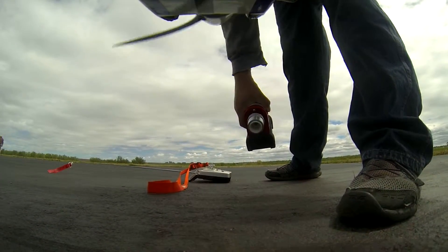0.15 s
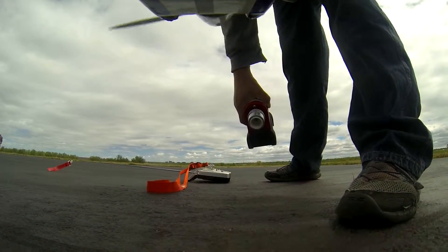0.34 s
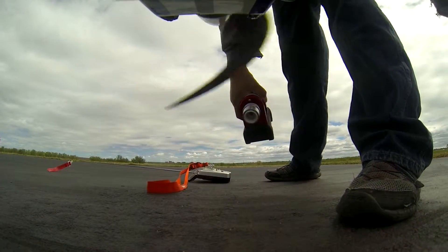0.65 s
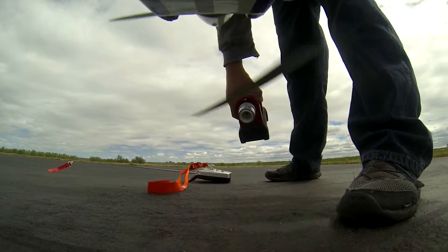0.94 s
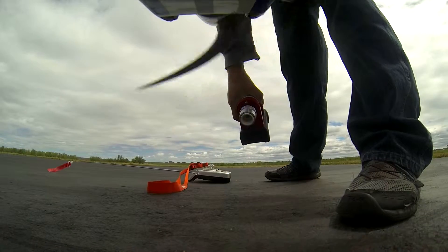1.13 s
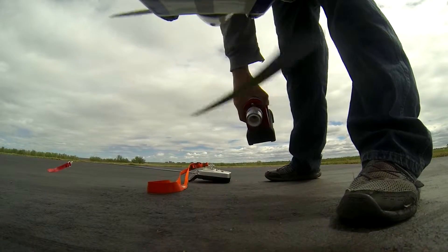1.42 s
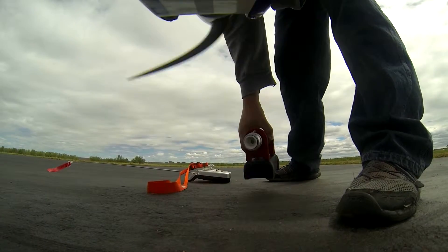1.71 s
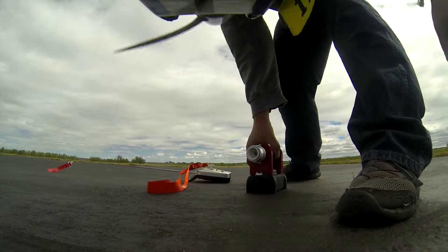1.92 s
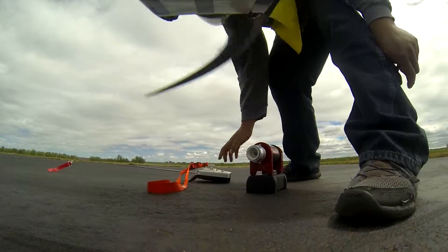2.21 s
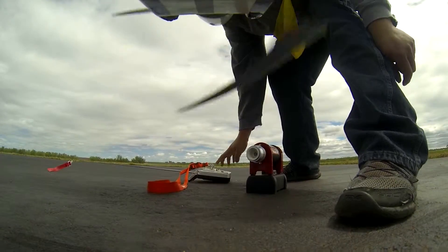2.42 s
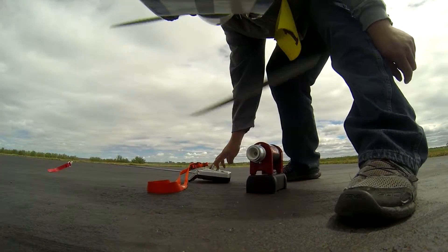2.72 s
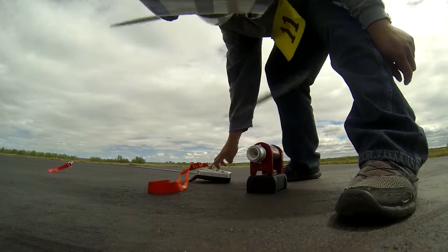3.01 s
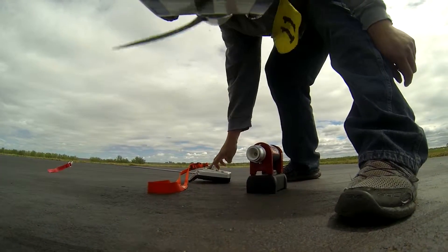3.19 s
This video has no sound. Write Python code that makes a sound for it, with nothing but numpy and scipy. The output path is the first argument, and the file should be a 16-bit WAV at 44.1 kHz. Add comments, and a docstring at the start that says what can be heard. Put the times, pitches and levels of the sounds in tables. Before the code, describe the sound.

A model aircraft's two-stroke engine idles close by in the open air from start to finish, with rapid, slightly uneven low exhaust thumps. Fine metallic ticking runs along with it, the shaken airframe rattles, and loose fittings clack now and then over a soft rush of propeller air. From about 3 seconds the engine fires faster and picks up slightly, until the end at around 3.4 seconds.

```python
"""A model aircraft's two-stroke engine idles on a runway, close by, at about 19 turns a second.
It fires mostly on every second turn, and on every turn as it picks up at the end. Each firing thumps in
the exhaust; piston and ports tick three times a turn, and the shaken airframe rattles in step with the
crank. Propeller wash rushes underneath."""
import sys
import numpy as np
from scipy import signal
from scipy.fft import rfft, irfft
from scipy.io import wavfile

SR = 44100
rng = np.random.default_rng(int(sys.argv[2]) if len(sys.argv) > 2 else 0)


def store_wav(level_fs):
    """Save 16-bit WAV to argv[1]."""
    pcm = np.round(np.clip(np.atleast_2d(level_fs), -1, 1) * 32767)
    wavfile.write(sys.argv[1], SR, pcm.T.astype(np.int16))


N = 147735

# firings at top dead centre: start_s, burn_strength, knock_db
FIRINGS = [(0.016, 0.79, 6.5), (0.066, 0.59, 3.5), (.171, 0.74, 3.5), (.218, 0.21, -5), (0.27, 0.35, -1),
           (.318, 0.43, -1.5), (0.369, .6, 0), (0.421, 0.14, 4), (0.472, 0.65, 1), (0.586, .8, 1.5),
           (0.693, 0.67, 2), (0.798, 0.55, 3.5), (0.899, 0.79, 6), (0.999, 1, 3.5), (1.104, 0.72, 3.5),
           (1.265, 0.87, 4.5), (1.376, 1.13, 5.5), (1.482, 0.76, 0.5), (1.588, .9, 5.5), (1.692, 0.77, 1.5),
           (1.792, .9, 4.5), (1.893, 0.62, 4.5), (2.0, 0.68, 7), (2.103, 0.64, 5), (2.205, .8, 5),
           (2.311, .8, 0), (2.417, 0.71, 1), (2.52, 0.52, -1), (2.572, 0.23, 3.5), (2.629, .9, 8),
           (2.678, .5, 2.5), (2.732, .6, 4), (2.839, 1.1, 3.5), (2.948, 1, 7.5), (3.052, 0.62, 5),
           (3.103, .7, 1), (3.148, 0.47, -6), (3.197, 0.63, 0), (3.239, 1, 1), (3.281, 0.81, -1.5),
           (3.323, 1.1, 2)]


def crank(turn_s=.052, last_turn_s=.043, coast_stretch=1.114, coast_knock_db=1):
    """The crank coasts and slows between firings. Per turn: start_s, length_s, burn, knock_db."""
    turns = []
    ends_s = [row[0] for row in FIRINGS[1:]] + [FIRINGS[-1][0] + last_turn_s]
    for (start_s, burn, knock_db), end_s in zip(FIRINGS, ends_s):
        gap_s = end_s - start_s
        stretch = coast_stretch ** np.arange(max(1, round(gap_s / turn_s)))
        for length_s in stretch * gap_s / stretch.sum():
            turns.append((start_s, length_s, burn, knock_db))
            start_s += length_s
            burn, knock_db = 0, coast_knock_db
    return np.transpose(turns)


# air pumped every turn: phase_turns, strength
PUFFS = [(.005, .45), (.32, .15), (.79, 1.15)]
# gas pushed out by a firing, then sucked back: delay_s, signed_strength
BLAST = [(.0113, 1.3), (.0167, -1)]
# resonances rung by the puffs: pitch_hz, level_db, t60_s
PUMP_MODES = [(38, -25, .15), (81.3, 4.5, 0.16), (183, -19.5, 0.14)]
# resonances rung by the blasts: pitch_hz, level_db, t60_s
EXHAUST_MODES = [(56.2, -9.5, 0.14), (62, 3, 0.09), (76.5, -8, 0.45), (127, -22, 0.028),
                 (169, -17.5, 0.082)]


def exhaust(start_s, length_s, burn, pump_db=-16.5, burn_db=-16, pulse_sigma_s=.0011):
    """The puffs of every turn and the blast of each firing boom in the exhaust."""
    puffs = sum(clicks(start_s + phase * length_s, np.full(len(start_s), size)) for phase, size in PUFFS)
    blasts = sum(clicks(start_s + delay_s, size * burn) for delay_s, size in BLAST)
    boom = sum(from_db(pump_db + db) * ring(puffs, hz, t60) for hz, db, t60 in PUMP_MODES)
    boom += sum(from_db(burn_db + db) * ring(blasts, hz, t60) for hz, db, t60 in EXHAUST_MODES)
    pulse = signal.windows.gaussian(SR // 50 + 1, pulse_sigma_s * SR)
    return signal.fftconvolve(boom, pulse / pulse.sum(), "same")


# piston knock, then two lighter ticks: phase_turns, level_db, rise_s, fall_s
TICKS = [(0, 0, 0.0012, 0.0011), (.335, -4.5, 0.0011, 0.0018), (.595, -2, 0.0011, .0008)]


def piston_contact(start_s, length_s, burn, knock_db, slide_db=-19, blowby_db=-2, blowby_s=.0056):
    """Gritty envelope of steady sliding, three ticks a turn and blow-by hiss after each firing."""
    t = np.arange(N) / SR
    power = np.full(N, from_db(slide_db) ** 2)
    scatter_db = rng.normal(0, .2, (len(start_s), len(TICKS)))
    for i in range(len(start_s)):
        near = np.abs(t - start_s[i] - length_s[i] / 2) < length_s[i]
        since_s = t[near] - start_s[i]
        for k, (phase, db, rise_s, fall_s) in enumerate(TICKS):
            age_s = since_s - phase * length_s[i]
            size = from_db(db + (scatter_db[i, k] if k else knock_db[i]))
            power[near] += (size * np.exp(-np.maximum(age_s / fall_s, -age_s / rise_s))) ** 2
        blowby = burn[i] * from_db(blowby_db) * (since_s > 0) * np.exp(-np.abs(since_s) / blowby_s)
        power[near] += blowby ** 2
    grit_db = 2.5 * np.repeat(rng.standard_normal(N // 20 + 1), 20)[:N]
    return np.sqrt(power) * from_db(grit_db)


# cylinder and crankcase: pitch_hz, level_db, t60_s
METAL_MODES = [(2600, -8, 0.024), (3055, 2.5, 0.031), (3428, 7, 0.012), (4370, -4.5, 0.032),
               (4690, -9.5, 0.022), (5080, 1, 0.016), (5273, 2, 0.022), (6690, -6.5, 0.0076),
               (6900, -16, 0.023), (9020, -9, 0.0048), (10040, -10.5, 0.0033), (11400, -24.5, .007)]


def engine_ticks(contact, level_db=-43.5, snap_db=-26):
    """Each contact rings the engine's metal and adds a dry treble snap."""
    metal = sum(from_db(db) * rms_one(ring(contact * rng.standard_normal(N), hz, t60))
                for hz, db, t60 in METAL_MODES)
    snap = from_db(snap_db) * rms_one(cut(contact ** 2 * rng.standard_normal(N), hz=8000, kind="high"))
    return from_db(level_db) * cut(rms_one(metal) + snap, hz=10900, kind="low", order=4)


def rattle(phase_turns, modes, shake, rate_per_s, spread_db=2.5):
    """Random contacts, harder at certain crank angles; each strikes every mode with its own strength."""
    shake_db = np.interp(phase_turns, *np.transpose(shake), period=1)
    sizes = from_db(shake_db + spread_db * np.minimum(rng.exponential(1, N), np.pi))
    contacts = sizes * (rng.random(N) < rate_per_s / SR)
    return rms_one(sum(from_db(db) * rms_one(ring(contacts * rng.standard_normal(N), hz, t60))
                       for hz, db, t60 in modes))


# loose fittings: pitch_hz, level_db, t60_s
FITTING_MODES = [(1074, -6, 0.03), (1229, 0, 0.018), (1355, -2, 0.023), (1524, 1.5, 0.027),
                 (1741, -1.5, 0.021), (2080, -8, 0.01), (2252, -11.5, 0.066)]
# chatter through a turn: phase_turns, level_db
FITTING_SHAKE = [(.03, 6.5), (0.142, -4.5), (.26, -1.5), (.34, 0), (.47, -4.5), (0.631, -4), (.74, 3),
                 (0.851, -5), (0.938, -3.5)]
# hard strikes: start_s, level_db, pitch_hz
CLACKS = [(0.1713, -2.5, 1450), (0.308, -3.5, 1530), (0.3618, -2.5, 1570), (0.419, 5, 1670),
          (0.4742, -4, 1240), (0.5169, 0, 1520), (0.6275, 0, 1470), (0.694, -2.5, 1490), (0.7746, -4, 1310),
          (0.7987, -3.5, 1480), (0.8938, -1.5, 1350), (1.0393, -4, 1470), (1.158, -1, 1530),
          (1.3112, -1.5, 1510), (1.3202, -2, 1520), (1.376, -13, 1610), (1.4, -4.5, 1290),
          (1.5194, -6, 1520), (1.5721, -2.5, 1520), (1.5894, -4, 1560), (1.6914, 0, 1220),
          (1.7379, -3.5, 1450), (1.7786, 0.5, 1290), (1.996, -1, 1560), (2.0418, -1, 1520),
          (2.104, 3, 1590), (2.2483, -3, 1550), (2.3524, 2.5, 1550), (2.4555, -1, 1550),
          (2.4885, 2.5, 1270), (2.5075, -7, 1460), (2.5139, 2, 1520), (2.5224, 0, 1520), (2.5571, -8, 1550),
          (2.5722, -6, 1550), (2.8769, -5, 1520), (2.9115, 1, 1530), (2.9428, -7, 1230), (3.2306, -4, 1390),
          (3.2725, 1.5, 1470)]


def fittings(phase_turns, vigour, chatter_db=-22, clack_db=-6, focus_db_per_octave=26):
    """Loose fittings chatter; now and then one clacks, ringing most in the modes near its pitch."""
    chatter = from_db(chatter_db) * rattle(phase_turns, FITTING_MODES, FITTING_SHAKE, rate_per_s=2400)
    start_s, level_db, pitch_hz = np.transpose(CLACKS)
    clacks = np.zeros(N)
    for k, (hz, db, t60) in enumerate(FITTING_MODES):
        loss_db = focus_db_per_octave * np.abs(np.log2(hz / pitch_hz))
        strikes = clicks(start_s, from_db(clack_db + level_db + db - loss_db))
        clacks += (-1) ** k * ring(strikes, hz, t60)
    dulled = cut(vigour * chatter + clacks, hz=2363, kind="low", order=4)
    return cut(dulled, hz=915, kind="high", order=4)


# wing and fuselage skin: pitch_hz, level_db, t60_s
SKIN_MODES = [(182.4, -7, 0.1), (284, -7.5, 0.086), (364, -4, 0.044), (408, 0.5, 0.048), (459, -2.5, 0.029),
              (610, -3.5, .022), (693, -7, 0.011), (808, -2.5, 0.045)]
# rattle through a turn: phase_turns, level_db
SKIN_SHAKE = [(.07, 1.5), (.22, -1), (.4, -4), (0.641, -8.5), (0.769, 1), (.92, -3.5)]


def skin(phase_turns, vigour, level_db=-26.5):
    """The shaken wing and fuselage skin gives a low rattle."""
    panels = from_db(level_db) * rattle(phase_turns, SKIN_MODES, SKIN_SHAKE, rate_per_s=1500)
    return cut(vigour * panels, hz=990, kind="low")


# rattle contour, before scaling by contour_depth: time_s, level_db
VIGOUR = [(0.0, -23), (0.17, -15), (0.19, -20), (0.48, -17), (0.82, -22.5), (1.33, -16), (1.45, -22),
          (2.47, -19), (2.53, -15), (2.54, -20.5), (2.96, -17.5), (2.97, -20), (3.34, -17.5), (3.35, -31.5)]


def airframe(start_s, length_s, knock_db, contour_depth=.74, knock_depth=.42):
    """The engine shakes fittings and skin in step with the crank, more when the piston knocks harder."""
    t = np.arange(N) / SR
    edges_s = np.append(start_s, start_s[-1] + length_s[-1])
    phase_turns = np.interp(t, edges_s, np.arange(len(edges_s))) % 1
    time_s, level_db = np.transpose(VIGOUR)
    contour_db = contour_depth * np.interp(t, time_s, level_db - level_db.mean())
    vigour = from_db(contour_db + knock_depth * np.interp(t, start_s, knock_db))
    return fittings(phase_turns, vigour) + skin(phase_turns, vigour)


# propeller wash and open air: frequency_hz, density_db
WASH_SPECTRUM = [(25, -23), (60, 17), (130, -4), (250, -35.5), (900, -19), (1500, -22), (2600, -21.5),
                 (4000, -24.5), (6000, -58), (10000, -76), (15000, -71)]


def propeller_wash(level_db=-31):
    """Smooth rush of air from the idling propeller."""
    hz, db = np.transpose(WASH_SPECTRUM)
    bins_hz = np.maximum(np.fft.rfftfreq(N, 1 / SR), 1)
    gain = from_db(np.interp(np.log(bins_hz), np.log(hz), db))
    return from_db(level_db) * rms_one(irfft(rfft(rng.standard_normal(N)) * gain, N))


def from_db(db):
    """Decibels to gain."""
    return 10 ** (np.asarray(db) / 20)


def rms_one(x):
    """Scale to an rms of one."""
    return x / np.sqrt(np.mean(x ** 2) + 1e-20)


def cut(x, hz, kind, order=2):
    """Butterworth high- or low-pass."""
    return signal.sosfilt(signal.butter(order, min(hz, .45 * SR), kind, fs=SR, output="sos"), x)


def clicks(times, sizes):
    """Single-sample impulses at the given times."""
    out, at = np.zeros(N), np.round(times * SR).astype(int)
    inside = (at >= 0) & (at < N)
    np.add.at(out, at[inside], sizes[inside])
    return out


def ring(x, hz, t60):
    """A unit click sets a cosine of height one ringing."""
    r, w = from_db(-60 / (t60 * SR)), 2 * np.pi * hz / SR
    return signal.lfilter([.5, 0, -.5], [1, -2 * r * np.cos(w), r * r], x + 1e-18)


def scene():
    """Exhaust, engine metal, airframe and propeller, close by in the open air."""
    start_s, length_s, burn, knock_db = crank()
    contact = piston_contact(start_s, length_s, burn, knock_db)
    engine = exhaust(start_s, length_s, burn) + engine_ticks(contact)
    return (engine + airframe(start_s, length_s, knock_db) + propeller_wash())[None]


def record(dry, cutoff_hz=15200):
    """The deepest bass is lost, peaks are rounded and the top is cut."""
    rounded = 1.292 * np.tanh(cut(dry, hz=27.5, kind="high") / 1.29)
    return signal.sosfilt(signal.ellip(10, .2, 70, cutoff_hz, fs=SR, output="sos"), rounded)


dry = scene()
out = record(dry)
store_wav(out)
```